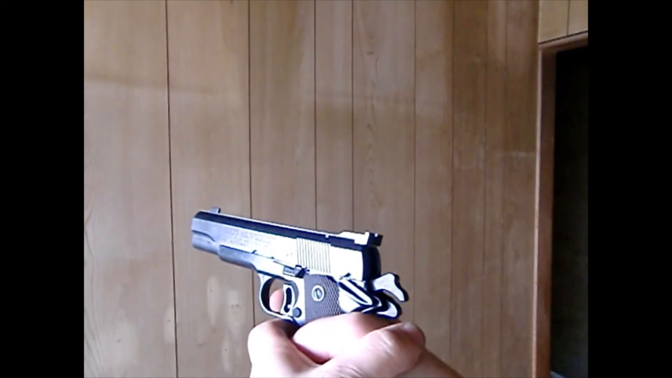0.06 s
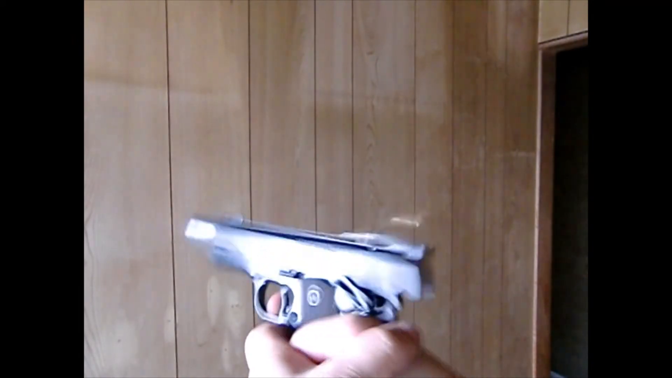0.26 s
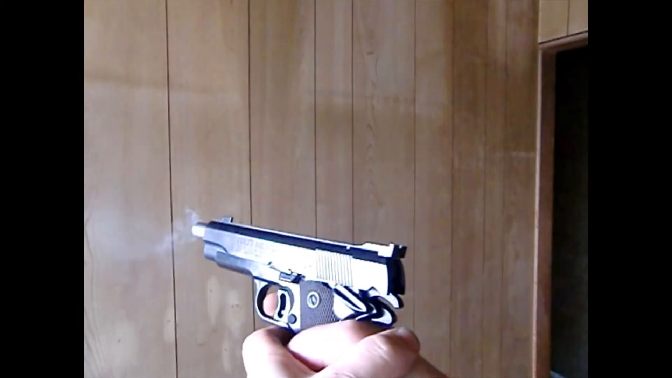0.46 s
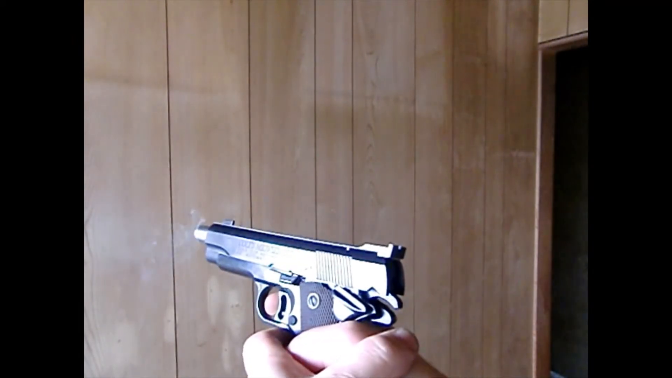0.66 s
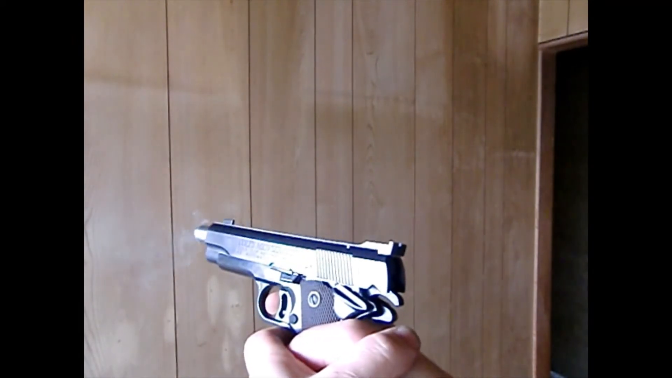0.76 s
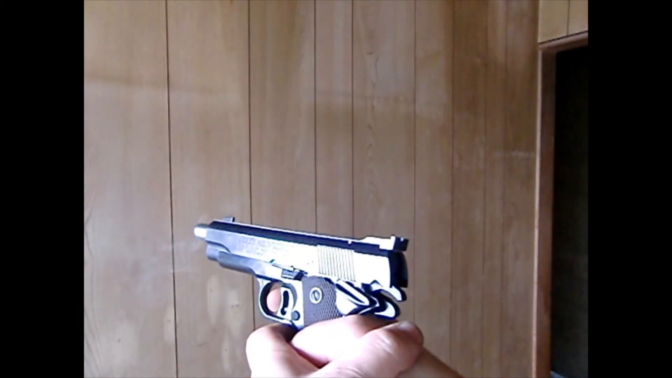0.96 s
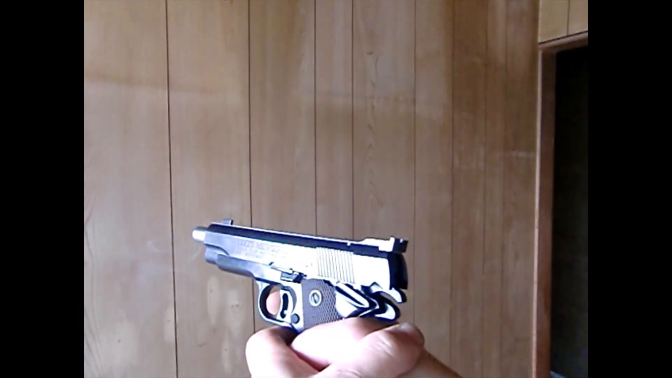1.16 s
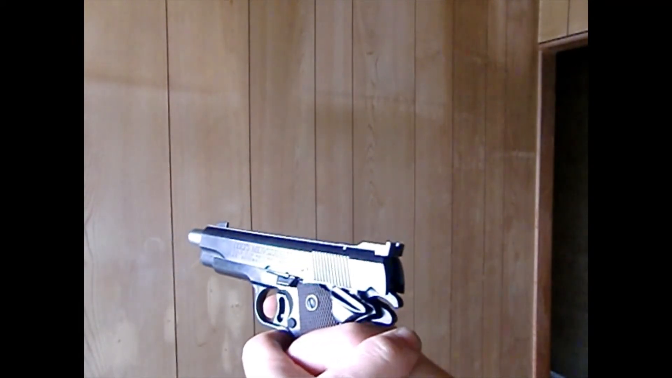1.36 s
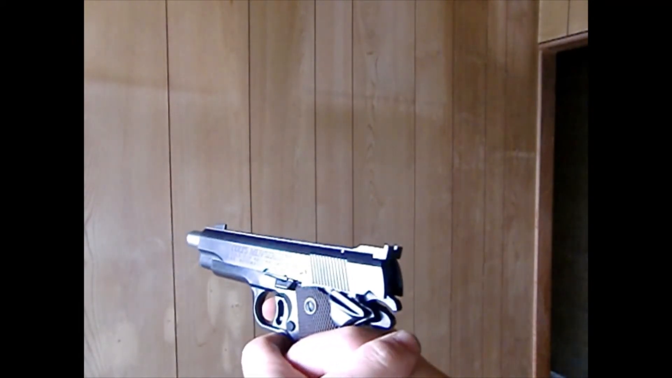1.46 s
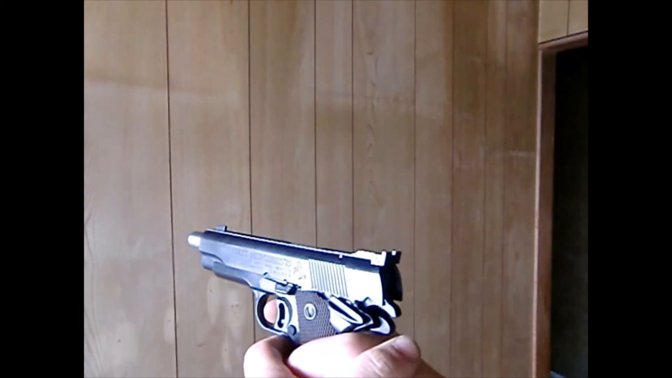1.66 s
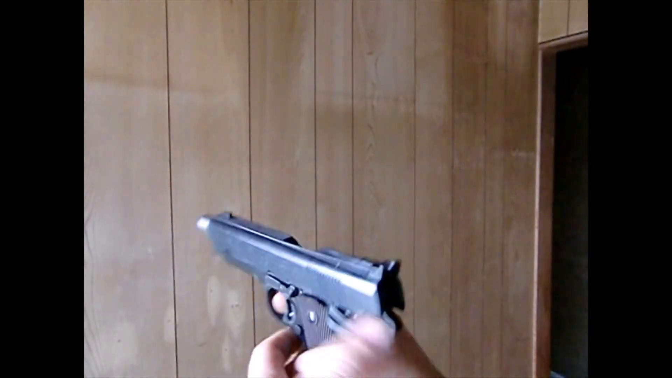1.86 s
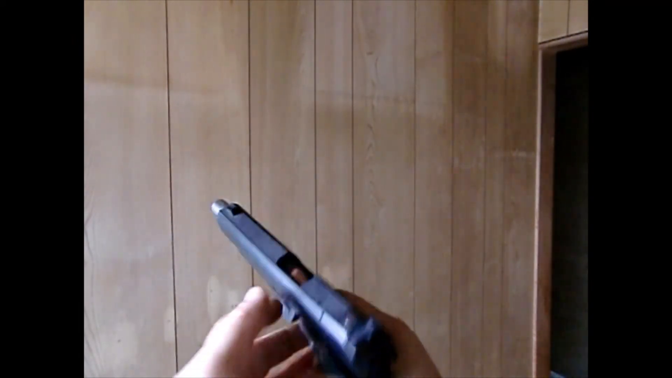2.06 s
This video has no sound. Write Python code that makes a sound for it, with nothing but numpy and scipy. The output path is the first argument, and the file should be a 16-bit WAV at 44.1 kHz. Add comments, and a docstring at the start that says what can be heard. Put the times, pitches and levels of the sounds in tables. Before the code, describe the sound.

A single cap-pistol shot cracks in a small wooden room, then its ejected case bounces and rolls

```python
"""Small ticks close to the microphone, in a small wood-panelled room, lead to one shot of a cap-firing pistol.
The report overloads the microphone; the slide slams just after it, with a thump and a faint ring of the gun.
Two later ticks and four knocks follow, probably the ejected case bouncing off wall and furniture;
the last lands on a hollow board, where it rattles and rolls.
Bursts are banded noise with a room tail; rings are decaying modes; the roll is grainy noise with two tones."""
import sys
import numpy as np
from scipy import signal
from scipy.io import wavfile

SR = 44100
rng = np.random.default_rng(int(sys.argv[2]) if len(sys.argv) > 2 else 0)


def store_pcm(level_fs):
    """Save levels as 16-bit WAV."""
    pcm = np.round(np.clip(level_fs, -1, 1) * 32767).astype(np.int16)
    wavfile.write(sys.argv[1], SR, np.atleast_2d(pcm).T)


N = 92610
TIME = np.arange(N) / SR

# Frequencies at which every colour row gives a level per noise band: (frequency [Hz])
COLOUR_HZ = [70, 130, 250, 400, 650, 1000, 1500, 2500, 4000, 7000, 14000]
KNOCK_TAIL_SHARE = 0.59  # ticks, knocks and rattle leave a shorter room tail than the shot


def from_db(db):
    """Turn decibels into amplitude gain."""
    return 10 ** (np.asarray(db) / 20)


def at_hz(values, hz):
    """Read a row given at COLOUR_HZ, interpolating along log frequency."""
    return np.interp(np.log(hz), np.log(COLOUR_HZ), values)


def low_cut(x, hz):
    """Second-order high-pass: remove what lies below hz."""
    return signal.sosfilt(signal.butter(2, hz, "high", fs=SR, output="sos"), x)


def noise_bands():
    """Split the spectrum into half-octave bands of unrelated noise, rms 1: (centre Hz, samples)."""
    edges = np.geomspace(30, 17000, 20)
    bands = []
    for low, high in zip(edges, edges[1:]):
        band_pass = signal.butter(2, [low, high], "band", fs=SR, output="sos")
        noise = signal.sosfilt(band_pass, rng.standard_normal(N))
        # steeper skirts on both sides
        noise = low_cut(noise, low * 0.8)
        noise = signal.sosfilt(signal.butter(2, high * 1.2, "low", fs=SR, output="sos"), noise)
        bands.append((np.sqrt(low * high), noise / noise.std()))
    return bands


def lag(x, seconds):
    """Smooth with one pole, as a store that fills and drains exponentially."""
    r = np.exp(-1 / (seconds * SR))
    return signal.lfilter([1 - r], [1, -r], x + 1e-18)


def ring(drive, hz, t60):
    """Two-pole resonance: a unit click starts an oscillation of height about 1 that falls 60 dB in t60."""
    r = from_db(-60 / (t60 * SR))
    w = 2 * np.pi * hz / SR
    return signal.lfilter([0.5, 0, -0.5], [1, -2 * r * np.cos(w), r * r], drive + 1e-18)


def strike(drive, modes):
    """Set a table of modes (Hz, dB, t60 s) ringing together, with alternating signs."""
    out = 0
    for k, (hz, db, t60) in enumerate(modes):
        out = out + ring(drive, hz, t60) * from_db(db) * (-1) ** k
    return out


def click(s, db):
    """Place a single impulse at s seconds."""
    return (np.arange(N) == int(s * SR)) * from_db(db)


def burst(bands, s, t60, send_db, colour_db, attack_s=0.0001, tail_share=1):
    """A dense burst whose energy fills the room and dies away there, band by band."""
    # Full reverberation time of the room at each COLOUR_HZ, scaled by tail_share: (t60 [s])
    room_t60_s = [0.76, 0.55, 0.59, 0.57, 0.6, 0.73, 0.76, 0.68, 0.6, 0.41, 0.33]
    build_s = 0.0058
    age = TIME - s
    fall = np.log(1e6)  # 60 dB of power
    # power grows exponentially up to s, then decays
    power = np.exp(np.maximum(np.minimum(age / attack_s, -fall * age / t60), -40))
    sent = lag(power, build_s) * from_db(send_db + 0.5) ** 2  # every send is raised by 0.5 dB
    out = 0
    for hz, noise in bands:
        tail = lag(sent, tail_share * at_hz(room_t60_s, hz) / fall)
        out = out + noise * from_db(at_hz(colour_db, hz)) * np.sqrt(power + tail)
    return out


def steady(colour_db):
    """Even noise of a given colour."""
    return sum(noise * from_db(at_hz(colour_db, hz)) for hz, noise in noise_bands())


def room_quiet():
    """The quiet background of the room: steady coloured noise."""
    # Background at each COLOUR_HZ: (level [dB])
    floor_db = [-83.5, -77, -69, -69.5, -68.5, -68, -70.5, -68.5, -69.5, -68.5, -69]
    return steady(floor_db)


def ticks():
    """Close, dry metallic ticks of the action: a noise burst and a brief ring of the frame each."""
    # Ticks before and after the shot: (time [s], relative level [dB])
    tick_times = [(.1218, 0), (0.1515, -12), (0.187, -14), (0.398, 7.5), (0.7138, -8)]
    # Colour of a tick of relative level 0, at each COLOUR_HZ: (level [dB])
    tick_db = [-76.5, -66.5, -65.5, -61.5, -58.5, -31.5, -34, -36.5, -29, -38.5, -39]
    # Brief modes of the frame, before the low cut: (frequency [Hz], level relative to the tick [dB], t60 [s])
    frame_modes = [(985, -26, 0.039), (3190, -31, .012), (3920, -22.5, 0.004), (6620, -29.5, 0.0039),
                   (9400, -27, 0.00088)]
    t60_s, send_db, low_cut_hz = 0.018, -10, 1300
    bands = noise_bands()
    snaps, clicks = 0, 0
    for s, db in tick_times:
        colour_db = np.add(tick_db, db)
        snaps = snaps + burst(bands, s, t60_s, send_db, colour_db, tail_share=KNOCK_TAIL_SHARE)
        clicks = clicks + click(s, db)
    return snaps + low_cut(strike(clicks, frame_modes), low_cut_hz)


def shot():
    """The cap bursts and spits; the slide slams, jolts the air and leaves the gun ringing."""
    # Cap report, then slide slam; the attack is the e-fold time of the power before its peak:
    # (peak time [s], attack [s], burst t60 [s], room send before its raise [dB], level at each COLOUR_HZ [dB])
    blasts = [(0.206, 0.00037, 0.056, -3, [-54, -49.5, -45.5, -26, -27.5, -18, -15.5, -5, -10, -10, -15]),
              (0.2629, 0.00085, 0.092, 2, [-70.5, -61, -57.5, -26, -23, -17, -16.5, -10.5, -14, -18.5, -21])]
    # Bright spit 2 ms after the peak of the report: (peak time [s], t60 [s], level at each COLOUR_HZ [dB])
    spit = (.2082, 0.013, [-70, -61, -52.5, -34, -25, -22, -16.5, -7.5, -9, -8.5, -2])
    # Low thump of the slam: (frequency [Hz], level [dB], t60 [s])
    thump = [(48, -31, 0.054), (114, -32, 0.03), (245, -24, 0.063)]
    # Faint ringing of the gun after the slam: (frequency [Hz], level [dB], t60 [s])
    gun_ring = [(807, -28, 0.85), (1043, -34, 1), (1890, -31.5, 1), (2314, -14, 0.19), (2553, -25, 0.73)]
    spit_s, spit_t60, spit_db = spit
    out = burst(noise_bands(), spit_s, spit_t60, -19.5, spit_db)
    for s, attack_s, t60, send_db, colour_db in blasts:
        out = out + burst(noise_bands(), s, t60, send_db, colour_db, attack_s)
    slam_s = blasts[-1][0]
    return out + strike(click(slam_s, 0), thump + gun_ring)


def bounces():
    """Four knocks: bursts and the ring of the surface met, with hard cracks in all but the third."""
    # Bounces of the case; the attack is the e-fold time of the power before its peak:
    # (peak time [s], attack [s], burst t60 [s], room send before its raise [dB], level at each COLOUR_HZ [dB])
    knocks = [(.8795, 0.0004, 0.021, 4.5, [-51, -36.5, -35, -31.5, -17.5, -20, -23, -26, -26.5, -32, -39]),
              (1.0769, 0.00013, 0.039, 8, [-51, -45, -32.5, -24.5, -28, -25, -27.5, -20, -27.5, -34.5, -43]),
              (1.4665, 0.00077, 0.08, 2.5, [-61, -41, -36, -24.5, -26.5, -49.5, -39, -43, -39.5, -42.5, -53.5]),
              (1.6229, 0.00026, 0.048, 4.5, [-57, -56.5, -24, -19, -10.5, -14.5, -13.5, -18.5, -24.5, -29.5, -41])]
    # Hard contacts within the bounces, before the low cut: (time [s], level [dB], frequency [Hz], t60 [s])
    contacts = [(0.8768, -17, 2500, .004), (0.8824, -8, 1370, 0.0084), (1.0769, -3.5, 3800, 0.0013),
                (1.6224, 7, 900, .003), (1.6283, -4, 2510, 0.0018)]
    # A list of modes for each of the first three surfaces: (frequency [Hz], level [dB], t60 [s])
    surfaces = [
        [(174.7, -40, 0.58), (236, -33.5, 0.34), (618, -43, .3), (793, -29, 0.23), (1450, -29.5, 0.31)],
        [(281, -35, 0.4), (391, -30, 0.17), (467, -24.5, 0.35), (800, -23.5, 0.34), (1880, -28.5, 0.38)],
        [(291.7, -39, 0.53), (404, -29, 0.13), (448, -22.5, 0.11), (564, -27, .3), (720, -35.5, 0.31)],
    ]
    # Modes of the hollow board, met last: (frequency [Hz], level [dB], t60 [s])
    board = [(386, -14, 0.39), (412.6, -16, 0.46), (549, -19, .41), (635, -20, 0.23), (757, -27, 0.87),
             (829, -19, 0.33), (853, -22, 0.25), (1024, -21.5, 0.46), (1019, -13.5, 0.41), (1215, -37, 0.6),
             (1790, -20, 0.29)]
    # sharp edge of each contact, its level relative to that contact
    snap_hz, snap_t60_s, snap_db = 6000, 0.00078, -6.5
    crack_low_cut_hz = 610
    bands = noise_bands()
    thuds, cracks, rings = 0, 0, 0
    for (s, attack_s, t60, send_db, colour_db), modes in zip(knocks, surfaces + [board]):
        thuds = thuds + burst(bands, s, t60, send_db, colour_db, attack_s, KNOCK_TAIL_SHARE)
        rings = rings + strike(click(s, 0), modes)
    for s, db, hz, t60 in contacts:
        cracks = cracks + ring(click(s, db), hz, t60)
        cracks = cracks + ring(click(s, db + snap_db), snap_hz, snap_t60_s)
    return thuds + low_cut(cracks, crack_low_cut_hz) + rings


def rattle():
    """Hops of the case after landing, as noise bursts: a few loud ones, then faint ones during the roll."""
    # Hops: (time [s], relative level [dB], brightness [dB per octave])
    hops = [(1.671, -0.5, -1.5), (1.689, -6.5, 1.5), (1.743, -5.5, -1), (1.771, -9, 1), (1.929, -30.5, 2),
            (1.962, -34.5, -7), (2.031, -32.5, -6.5)]
    # Colour of a hop of relative level 0 and no tilt, at each COLOUR_HZ: (level [dB])
    hop_db = [-77, -70, -33, -22, -18, -14.5, -19, -15.5, -22, -36, -45]
    t60_s, send_db = 0.043, 3.5
    bands = noise_bands()
    octaves = np.log2(np.divide(COLOUR_HZ, 1500))  # brightness pivots at 1500 Hz
    out = 0
    for s, db, tilt_db in hops:
        # shift the noise so that each hop has its own grain
        fresh = [(hz, np.roll(noise, int(s * SR))) for hz, noise in bands]
        colour_db = np.add(hop_db, db + tilt_db * octaves)
        out = out + burst(fresh, s, t60_s, send_db, colour_db, tail_share=KNOCK_TAIL_SHARE)
    return out


def roll():
    """The case rolls: a grainy rumble and two low tones of the board, kept sounding by noise."""
    # Course of the roll, silent before its first point: (time [s], relative level [dB])
    roll_course = [(1.75, -9), (1.9, -0.5), (2.0, -3), (2.1, -2)]
    # Rumble before the course is applied, at each COLOUR_HZ: (level [dB])
    rumble_db = [-74, -63, -52, -53.5, -43, -51, -42, -52.5, -55, -70.5, -66]
    # Tones drawn from the board, before the course: (frequency [Hz], rms level [dB])
    board_tones = [(296, -47), (448, -43.5)]
    grain_db, grain_s, tone_t60_s = 1, 0.0071, 0.21
    grain = lag(rng.standard_normal(N), grain_s)
    out = steady(rumble_db) * from_db(grain_db * grain / grain.std())
    for hz, db in board_tones:
        tone = ring(rng.standard_normal(N), hz, tone_t60_s)
        out = out + from_db(db) * tone / tone.std()
    times, levels_db = np.transpose(roll_course)
    return out * from_db(np.interp(TIME, times, levels_db, left=-100))


def scene():
    """All sources over the quiet of the room, at one microphone."""
    return (room_quiet() + ticks() + shot() + bounces() + rattle() + roll())[None]


def record(dry):
    """The microphone rounds off only the highest peaks, then a steep low-pass cuts the top."""
    overload, cutoff_hz = 0.58, 15900  # overload: the amplitude that peaks cannot exceed before the low-pass
    rounded = dry / (1 + (dry / overload) ** 4) ** 0.25
    return signal.sosfilt(signal.ellip(10, 0.1, 80, cutoff_hz, fs=SR, output="sos"), rounded)


dry = scene()
out = record(dry)
store_pcm(out)
```